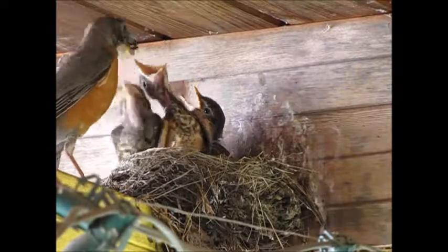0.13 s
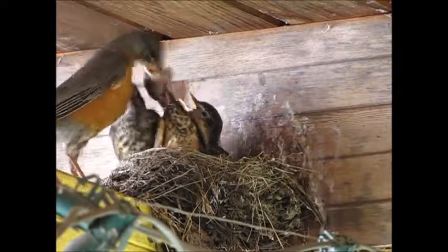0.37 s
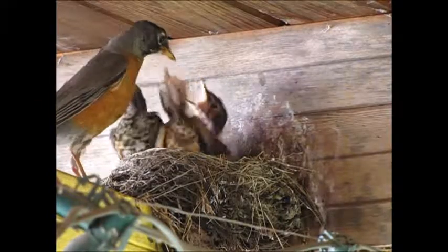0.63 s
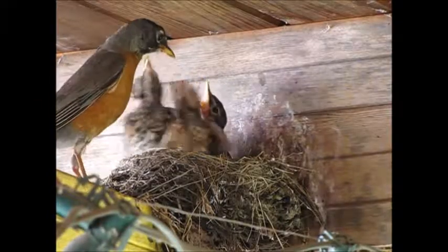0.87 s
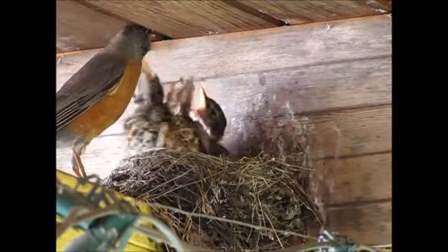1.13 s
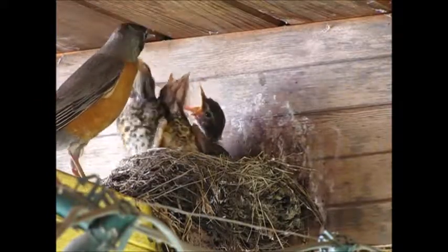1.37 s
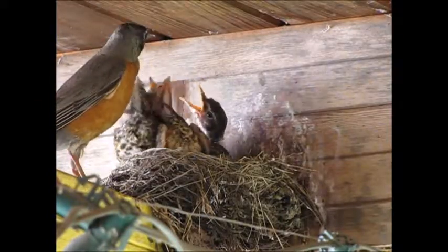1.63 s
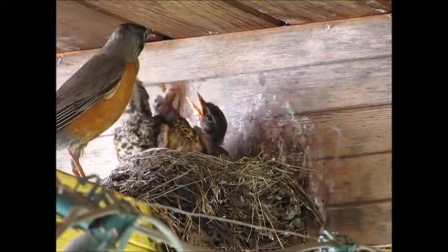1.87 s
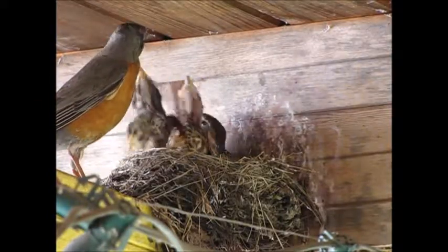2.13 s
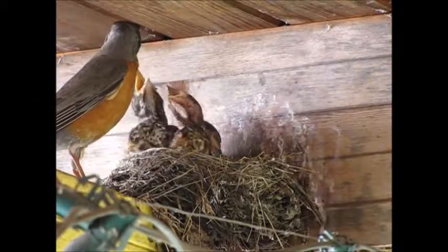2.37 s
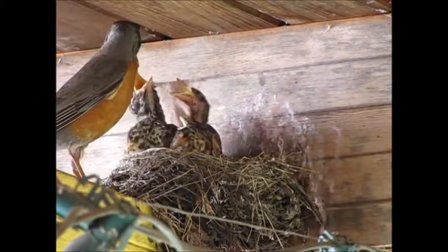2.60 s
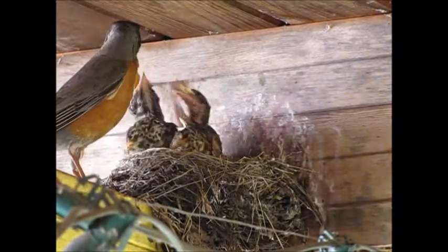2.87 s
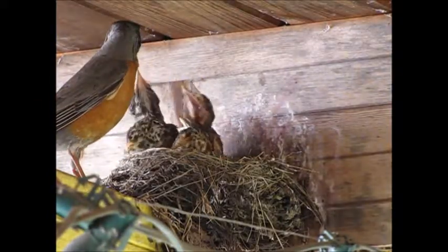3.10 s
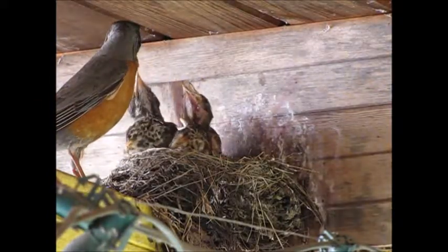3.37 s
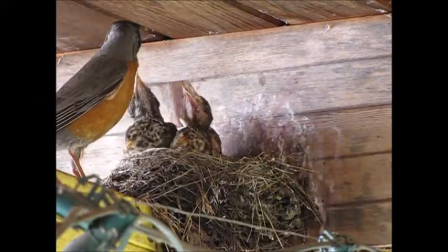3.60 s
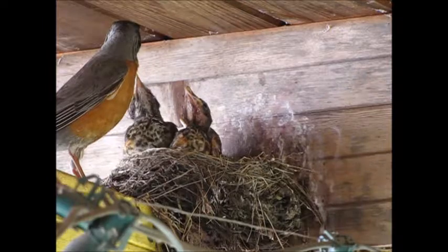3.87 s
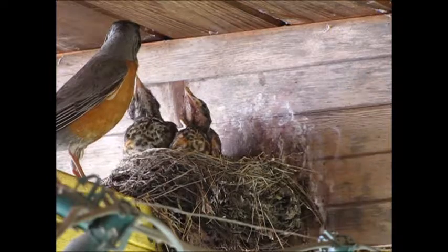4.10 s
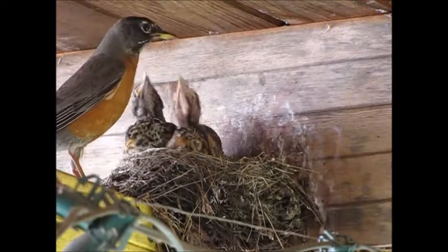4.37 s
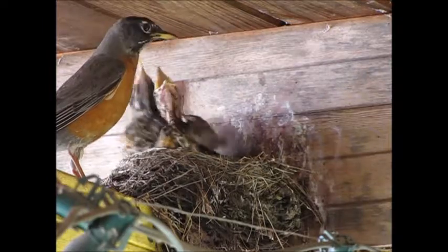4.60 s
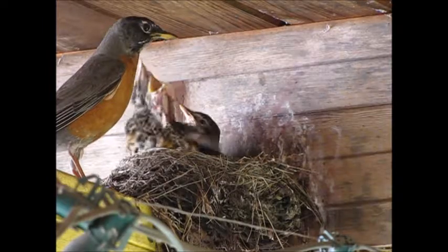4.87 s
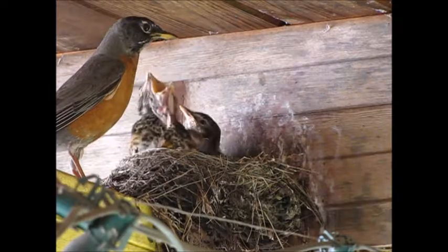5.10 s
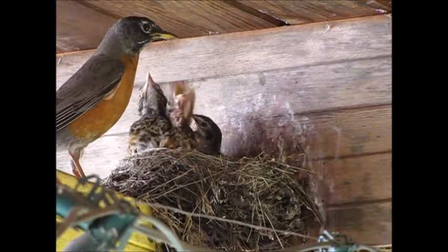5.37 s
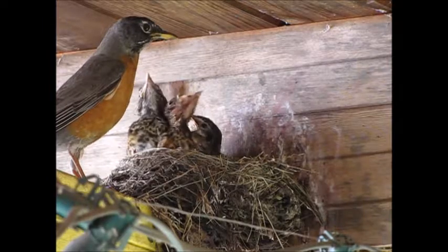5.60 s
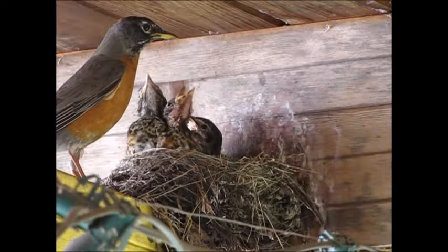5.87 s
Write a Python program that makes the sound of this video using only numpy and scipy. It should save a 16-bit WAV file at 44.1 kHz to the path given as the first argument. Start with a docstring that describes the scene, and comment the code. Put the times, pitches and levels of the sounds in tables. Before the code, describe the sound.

Young robins in a nest beneath a wooden roof give quick runs of short, piercing, arched chirps, split by brief gaps. They start fairly weak, turn brighter after two seconds, dip near four, then peak. Faint clicks, small peeps and far twitter surround them. A close stereo microphone catches short plank echoes, low hum and smooth outdoor noise.

```python
"""Nestlings beg in runs of short high chirps: arched tones from two voices of the syrinx at once.
Low feet and short broadband clicks go with the chirps, most clicks at chirp onsets.
A plank shed answers with single echoes and a dense tail; the yard beyond answers more slowly and faintly.
Peeps, level whistles, rising pips and overtones and a far twitter are short tones with their own bends.
Behind lie smooth outdoor noise and wavering low machine tones."""
import sys
import numpy as np
from scipy import signal
from scipy.io import wavfile
from scipy.ndimage import uniform_filter1d

SR = 44100
rng = np.random.default_rng(int(sys.argv[2]) if len(sys.argv) > 2 else 0)


def wrap_up_sound(samples):
    """Save the sound to the file named by the first command line argument, as 16-bit audio."""
    columns = np.atleast_2d(samples).T
    # keep every value between -1 and 1, then stretch to whole-number steps
    tamed = np.clip(columns, -1, 1)
    steps = np.round(tamed * 32767).astype(np.int16)
    wavfile.write(sys.argv[1], SR, steps)


def invert_db(x):
    """Field ratio 10**(x/20) for x, a level in decibels (scalar or array-like)."""
    u = np.asarray(x, float) / 20
    return 10 ** u


N = 263718

# Begging chirps: (crest time [s], upper voice level [dB], lower voice level [dB],
# crest pitch of the lower voice [Hz], nominal length [s])
BEGGING_CHIRPS = [(.019, -30, -36, 6430, 0.068), (0.145, -40, -34, 7330, 0.042),
                  (0.214, -41, -31, 7030, 0.06), (0.285, -40, -29, 6820, 0.06),
                  (.774, -38, -57, 6950, 0.019), (0.848, -41.5, -42, 6430, 0.068),
                  (0.931, -39.5, -48, 6360, 0.04), (1.071, -37, -32.5, 7210, 0.057),
                  (1.137, -29, -33.5, 6920, .053), (1.208, -37, -21.5, 6870, 0.05),
                  (1.352, -42.5, -38, 7240, .12), (1.417, -45, -30, 7190, 0.068),
                  (1.49, -29.5, -34.5, 6565, .073), (1.623, -38, -30.5, 7240, 0.048),
                  (1.693, -35, -39.5, 6860, 0.072), (1.771, -34, -35.5, 6750, 0.089),
                  (1.847, -34, -29.5, 6550, 0.045), (1.979, -35.5, -42, 7030, .04),
                  (1.999, -48, -31.5, 6460, 0.043), (2.151, -35, -28.5, 6850, 0.057),
                  (2.222, -30, -25.5, 6700, 0.053), (2.298, -25, -22.5, 6600, 0.05),
                  (2.375, -26, -19.5, 6405, 0.038), (2.555, -29.5, -32.5, 6930, 0.032),
                  (2.621, -34, -28, 6800, 0.064), (2.696, -29, -24.5, 6600, 0.077),
                  (2.775, -29.5, -21, 6460, 0.059), (2.97, -36, -30.5, 6920, 0.05),
                  (3.045, -39, -23, 6940, 0.063), (3.123, -34, -17, 6850, 0.046),
                  (3.203, -23, -22, 6520, 0.043), (3.391, -27.5, -32, 6830, 0.036),
                  (3.462, -34, -23, 6890, 0.055), (3.541, -28.5, -21.5, 6630, 0.055),
                  (3.621, -28, -25.5, 6450, 0.052), (3.843, -35, -42, 6920, 0.043),
                  (3.915, -33.5, -32, 6520, 0.033), (3.995, -36, -33, 6590, .049),
                  (4.079, -33.5, -32.5, 6500, 0.042), (4.314, -40, -28.5, 7150, .034),
                  (4.388, -28, -24.5, 6900, 0.063), (4.461, -22, -19, 6810, 0.064),
                  (4.54, -20, -19.5, 6670, 0.055), (4.616, -19, -18.5, 6480, 0.042),
                  (4.768, -26.5, -20, 6890, 0.041), (4.846, -27, -17.5, 6890, 0.036),
                  (4.925, -21.5, -20.5, 6660, .051), (5.009, -21.5, -19, 6690, 0.054),
                  (5.091, -23, -24, 6090, 0.036), (5.251, -32.5, -26, 7000, 0.041),
                  (5.322, -40, -20, 6970, 0.041), (5.402, -33, -19, 6820, 0.046),
                  (5.483, -20.5, -22, 6630, 0.041), (5.569, -32.5, -26.5, 6340, 0.063),
                  (5.762, -37, -28.5, 7010, .049), (5.835, -44, -26.5, 6900, 0.055),
                  (5.919, -33, -29.5, 6730, 0.066)]
# Aim of the singing head: (time [s], turn [0 facing to 1 away])
HEAD_TURN = [(0, 0.49), (.9, 0.78), (1.2, 0.42), (1.4, 0.43), (2.05, 0.6), (2.15, 0.079), (3.7, 0.069),
             (3.9, 0.63), (4.2, 0.37), (4.4, 0.11), (6, 0.22)]
PAUSE_S = 0.1  # a longer gap between crests parts two runs
LEG_HZ = 3990  # sweep of the lower voice from crest to foot
VOICE_GAP_HZ = 431  # the upper voice crests this far above the lower
FALL_LEG_DB = -5  # thin part of the falling leg relative to the rising one
FALL_FADE = 1.07  # fade per kHz after the crest over swell per kHz before it
BROKEN_DB = 4  # rms flicker of thin legs and faint notes

# Low feet where chirps begin or end their sweep:
# (start [s], length [s], nominal level [dB], lowest pitch [Hz])
CHIRP_FEET = [(1.175, .027, -44, 2375), (1.229, .014, -44, 2200), (1.501, .019, -43, 2335),
              (3.182, 0.013, -46, 3030), (3.225, 0.022, -44, 2400), (3.583, 0.03, -48.5, 2630),
              (3.649, 0.022, -45.5, 2270), (3.957, 0.03, -45, 2480), (4.058, 0.015, -44, 3050),
              (4.101, 0.0264, -46, 2320), (5.452, 0.018, -47, 2480), (5.538, 0.019, -44, 2490),
              (5.881, 0.029, -46.5, 2436), (5.947, 0.018, -49.5, 2720)]
FOOT_BEND_HZ, FOOT_CURVE = 1283, 3  # the bend steepens towards the chirp
# Short broadband clicks, most at chirp onsets: (start [s], level before colouring [dB])
CHIRP_CLICKS = [(.4744, -62), (.5644, -65), (.759, -52), (.836, -51), (.918, -47.5), (4.2985, -51),
                (4.749, -57), (5.233, -61)]
# Colour of a click: (frequency [Hz], gain [dB])
CLICK_COLOUR = [(1500, -25), (4000, 7), (8000, 11.5), (12000, 9), (16000, 4)]
CLICK_S = 0.011  # time constant of the decay

# Soft cup-shaped peeps: (start [s], length [s], nominal level [dB], middle pitch [Hz])
CUPPED_PEEPS = [(0.632, .057, -48.5, 1735), (.855, 0.059, -51, 1775), (0.925, 0.054, -46.5, 1810),
                (1.338, 0.028, -50.5, 1750), (1.411, 0.026, -44.5, 3140), (1.475, 0.031, -52, 1790),
                (1.567, .038, -47, 3250), (1.64, 0.055, -57, 3080), (1.721, .051, -52, 3140),
                (4.529, .034, -51.5, 1760)]
PEEP_BEND_HZ = 674  # rise at either end
# Level whistles, some at chirp pitch near 7 kHz: (start [s], length [s], nominal level [dB], pitch [Hz])
LEVEL_WHISTLES = [(0.225, 0.028, -49.5, 1900), (0.396, .038, -54, 7100), (0.689, 0.13, -51, 4400),
                  (0.979, .03, -46, 7370), (1.298, 0.023, -47, 7640), (1.467, .014, -41, 4380),
                  (1.519, 0.037, -37.5, 7260), (1.756, .015, -46, 4470), (1.808, .025, -50, 7100),
                  (1.933, .015, -41, 7440), (2.322, 0.031, -51, 2960), (2.911, 0.029, -46, 6630),
                  (3.649, 0.036, -49, 4440), (3.71, 0.04, -57, 4440), (3.781, 0.082, -60, 4450),
                  (5.96, .021, -51.7, 3300)]
# Rising pips, and the rising overtones of two chirps, an octave above them (the two highest):
# (start [s], nominal level [dB], middle pitch [Hz])
RISING_NOTES = [(.464, -47, 4150), (.549, -47.5, 3850), (.562, -48, 6650), (.843, -54, 14200),
                (.92, -51, 13400), (1.825, -45, 3850)]
RISING_S, RISING_SLIDE, RISING_FLICK_HZ = 0.0297, 0.19, 300  # length, slide as share of pitch, final flick up
# Far twittering flock: (time [s], mean nominal level of a note [dB])
FLOCK_LEVEL = [(0, -57), (.6, -58), (1.5, -57), (2.2, -64), (6, -65)]
FLOCK_NOTES_PER_S = 70

# Echoes from the nearest planks: (delay [s], left level [dB], right level [dB])
PLANK_ECHOES = [(.0071, -17, -16), (.0125, -11, -12), (.0157, -19, -21), (.045, -22, -23)]
# Decay of the shed: (frequency [Hz], time to fall 60 dB [s])
SHED_DECAY = [(2000, 0.5), (5000, 0.2), (7000, 0.17), (10000, 0.22)]
TAIL_DB, TAIL_FILL_S = -5.5, 0.026  # energy of the whole tail, time it takes to build
YARD_DB, YARD_T60_S = -14, 0.47  # return from beyond the shed, relative to the shed's
LEFT_LAG_S = 0.00003  # direct sound reaches the left port this much later

# Spectrum of the outdoor air: (frequency [Hz], relative density [dB per Hz])
AIR_SPECTRUM = [(15, -43), (25, 3), (101, -1.5), (169, -11.5), (246, -14.5), (582, -15.5), (826, -14.5),
                (2300, -22), (3630, -22), (5000, -27.5), (7000, -30), (8000, -34), (9300, -43),
                (15500, -45)]
# Left-right likeness of the air: (frequency [Hz], correlation)
AIR_LIKENESS = [(60, 0.92), (180, 0.83), (550, 0.85), (1650, 0.24), (4970, 0.48), (15000, 0.05)]
# Balance of the air: (frequency [Hz], left over right [dB])
AIR_BALANCE = [(60, 1.5), (240, 2.5), (950, 1.0), (3770, -1), (15000, 3.5)]
AIR_DB = -41  # rms over both ports
# Tones of the machine: (mean pitch [Hz], level at the centre [dB rms], rms pitch wander [Hz])
MACHINE_TONES = [(59.24, -47, 6.01), (120.1, -46, 2.85), (140, -58, 4.2), (167.8, -55, 2.91),
                 (321.5, -60.5, 8.14)]


def read(points, hz):
    """Log-frequency interpolation: reads a spectrum between its points."""
    f, value = np.transpose(points)
    return np.interp(np.log(hz + 1), np.log(f + 1), value)


def add(mix, s, sound):
    """Superposition: adds a sound at a moment, cutting what falls outside the mix."""
    at = round(s * SR)
    sound = sound[..., max(-at, 0):]
    part = mix[..., max(at, 0):][..., :sound.shape[-1]]
    part += sound[..., :part.shape[-1]]


def drift(length, seconds):
    """Low-pass noise: twice-averaged chance of rms 1."""
    size = max(round(seconds * SR), 2)
    x = uniform_filter1d(uniform_filter1d(rng.standard_normal(length), size), size)
    return x / np.sqrt(np.mean(x ** 2))


def tone(hz):
    """Phase is the integral of frequency: a sine of rms 1 on a pitch curve."""
    phase = 2 * np.pi * (np.cumsum(hz) / SR + rng.random())
    return np.sqrt(2) * np.sin(phase)


def chirp(upper_db, lower_db, lower_hz, length, place, turn):
    """Beak directivity: two arched voices, beamed forward at the crest, with thin legs fuller in the shed."""
    opens = place == 0
    rise, fall = 0.42 * length, (0.5 if opens else 0.58) * length
    t = np.arange(-rise, fall, 1 / SR)
    along = np.where(t < 0, -t / rise, t / fall)
    drop_hz = np.where((t < 0) & opens, 400, LEG_HZ) * along ** 2.8  # a run opens near the crest
    edge = np.clip(np.minimum(t - t[0], t[-1] - t) / (0.002 if opens else 0.005), 0, 1)
    out = np.zeros((2, len(t)))  # rows: in front, all round
    voices = ((upper_db, lower_hz + VOICE_GAP_HZ, 0.8, -66), (lower_db, lower_hz, 1, -56))
    for db, crest_hz, reach, leg_db in voices:
        hz = crest_hz - reach * drop_hz + 45 * drift(len(t), 0.002)
        under_khz = reach * drop_hz / 1000
        fade = under_khz * np.where(t > 0, FALL_FADE, 1)
        beam = invert_db(db - np.outer([17, 9], fade))  # dB lost per kHz below the crest
        thin_db = min(leg_db + 3 * min(place, 3) + 5 * turn, db)  # the legs grow early in a run
        thin_db = thin_db + FALL_LEG_DB * (t > 0) - 0.28 * under_khz
        thin = invert_db(thin_db + BROKEN_DB * drift(len(t), 0.0065))
        level = np.hypot(beam, thin)
        level *= invert_db(1.5 * drift(len(t), 0.003))
        breath = invert_db(-34) * np.diff(rng.standard_normal(len(t) + 1))  # thin hiss of the air stream
        rasp = 1 + invert_db(-21 + 13 * turn) * drift(len(t), 0.00035)  # fast flutter, stronger when turned away
        out += level * (rasp * tone(hz) + breath)
    swing = out / abs(out).max()
    out *= 1 + invert_db(-51) * swing - 0.14 * swing ** 2  # the voices mix in one pipe: sum tones and side lines
    out[1] *= invert_db(5.8 * turn)  # a turned head sings more to the planks
    return rise, edge * out


def nestlings():
    """Source directivity in time: each chirp follows its place in the run and the turn of the head."""
    out, place = np.zeros((2, N)), 2  # the first chirp falls within a run
    pauses = np.diff([0] + [row[0] for row in BEGGING_CHIRPS]) > PAUSE_S
    for (s, *voice), opens in zip(BEGGING_CHIRPS, pauses):
        place = 0 if opens else place + 1
        turn = np.clip(np.interp(s, *np.transpose(HEAD_TURN)), 0, 1)
        lead, sound = chirp(*voice, place, turn)
        add(out, s - lead, sound)
    return out


def chirp_clicks():
    """Broadband transients: coloured noise that swells at once and dies away."""
    out = np.zeros(N)
    for s, db in CHIRP_CLICKS:
        t = np.arange(round(4 * CLICK_S * SR)) / SR / CLICK_S  # in time constants
        crackle = rng.standard_normal(len(t)) * invert_db(3 * drift(len(t), 0.0006))
        add(out, s, invert_db(db) * crackle * np.minimum(t / 0.29, 1) * np.exp(-t ** 2))
    hz = np.linspace(0, SR / 2, 65)
    colour = signal.firwin2(129, hz, invert_db(read(CLICK_COLOUR, hz)), fs=SR)
    return signal.oaconvolve(out, colour, "same")


def note(length, db, hz, bend_hz):
    """Frequency modulation: a flickering whistle, bent by bend_hz(place from -1 start to 1 end)."""
    along = np.linspace(-1, 1, round(length * SR))
    fade = signal.windows.tukey(len(along), 0.2)
    level = invert_db(db - 1.5 + BROKEN_DB * drift(len(along), 0.003))  # -1.5 offsets power gained by flicker
    pitch = hz + bend_hz(along) + 50 * drift(len(along), 0.002)
    return level * tone(pitch) * fade


def ends(start_hz, end_hz):
    """Quartic pitch law: nearly level in the middle and bent at the ends."""
    return lambda along: np.where(along < 0, start_hz, end_hz) * abs(along) ** 4


def chirp_feet(out):
    """One-sided glide: low feet bend up into the nearest chirp or down out of it."""
    crests = np.array(BEGGING_CHIRPS)[:, 0]
    for s, length, db, hz in CHIRP_FEET:
        nearest = crests[np.argmin(abs(crests - s - length / 2))]
        way = np.sign(nearest - s)
        add(out, s, note(length, db, hz, lambda along: FOOT_BEND_HZ * ((1 + way * along) / 2) ** FOOT_CURVE))


def far_flock(out):
    """Random superposition: short notes at chance moments, pitches and bends make a twitter."""
    for when, length, size, pitch, start, end in rng.random((round(FLOCK_NOTES_PER_S * N / SR), 6)):
        s = when * N / SR
        db = np.interp(s, *np.transpose(FLOCK_LEVEL)) + 8 * (size - 0.5)
        bend = ends(2400 * (start - 0.5), 2400 * (end - 0.5))
        add(out, s, note(0.006 + 0.01 * length, db, 2400 + 2400 * pitch, bend))


def faint_notes():
    """Superposed glides: chirp feet, peeps, level whistles and rising notes, over the far flock."""
    out = np.zeros(N)
    chirp_feet(out)
    for s, *shape in CUPPED_PEEPS:
        add(out, s, note(*shape, ends(PEEP_BEND_HZ, PEEP_BEND_HZ)))
    for s, *shape in LEVEL_WHISTLES:
        add(out, s, note(*shape, np.zeros_like))
    for s, db, hz in RISING_NOTES:
        add(out, s, note(RISING_S, db, hz, ends(-RISING_SLIDE * hz, RISING_FLICK_HZ)))
    far_flock(out)
    return out


def room_response():
    """Diffuse reverberation: random reflections decay band by band, with single plank echoes."""
    taps = np.zeros((2, SR // 2))
    slots = np.arange(200, SR // 2 - 20, 20)
    at = slots + rng.integers(0, 20, (2, len(slots)))
    np.put_along_axis(taps, at, rng.choice([-1., 1.], at.shape), 1)
    hz, t, z = signal.stft(taps, SR, nperseg=256)
    shed_decay = invert_db(-60 * t / read(SHED_DECAY, hz)[:, None])
    yard_decay = invert_db(YARD_DB - 60 * t / YARD_T60_S)
    z *= np.hypot(shed_decay, yard_decay) * np.minimum(t / TAIL_FILL_S, 1)
    tail = signal.istft(z, SR, nperseg=256)[1]
    room = invert_db(TAIL_DB) * tail / np.linalg.norm(tail[0])
    for delay, left_db, right_db in PLANK_ECHOES:
        room[:, round(delay * SR)] += invert_db(np.array([left_db, right_db]))
    return room


def shed(front, around):
    """Image of a source in a room: direct sound in front plus the room's answer to sound all round."""
    lag = np.array([[LEFT_LAG_S * SR], [0]])
    ports = np.sinc(np.arange(-32, 33) - lag) * invert_db(np.array([[-0.3], [0.3]]))
    direct = signal.oaconvolve(front[None], ports, axes=1)[:, 32:N + 32]
    return direct + signal.fftconvolve(around[None], room_response(), axes=1)[:, :N]


def air():
    """Spatial coherence: noise of far traffic and leaves, most alike in both ports in the bass."""
    frames, hz = N // 512 + 5, np.fft.rfftfreq(2048, 1 / SR)
    a, b, c, d, patches = rng.standard_normal((frames, 1025, 5)).T
    patches = uniform_filter1d(uniform_filter1d(patches, 20, 0), 8, 1)
    same = np.clip(read(AIR_LIKENESS, hz), -1, 1)[:, None]
    left = a + 1j * b
    right = same * left + np.sqrt(1 - same ** 2) * (c + 1j * d)
    lean = read(AIR_BALANCE, hz)[:, None] / 2
    level = read(AIR_SPECTRUM, hz)[:, None] + 1.12 * patches / patches.std()
    z = np.array([left, right]) * invert_db(level + np.array([lean, -lean]))
    x = signal.istft(z, nperseg=2048, noverlap=1536)[1][:, :N]
    return invert_db(AIR_DB) * x / np.sqrt(np.mean(x ** 2))


def hum():
    """Narrow-band modulation: wavering low tones of a nearby machine, a little louder on the left."""
    out = np.zeros(N)
    for hz, db, wander in MACHINE_TONES:
        level = invert_db(db + 2 * drift(N, 0.038))
        out += level * tone(hz + wander * drift(N, 0.0317))
    return out * invert_db(np.array([[1.1], [-1.1]]))


def scene():
    """Superposition of fields: chirps, clicks and faint notes in the shed, over air and hum."""
    faint = faint_notes() * invert_db(np.array([[0], [-5]]))  # set with less room sound
    front, around = nestlings() + chirp_clicks() + faint
    return shed(front, around) + air() + hum()


def low_pass(x):
    """Removes everything above the highest recorded frequency."""
    return signal.sosfilt(signal.butter(12, 16340, fs=SR, output="sos"), x)


def record(dry):
    """Low-pass response: the microphone dulls the top treble."""
    dulled = signal.sosfilt(signal.butter(4, 14500, fs=SR, output="sos"), dry)
    return low_pass(dulled)


dry = scene()
out = record(dry)
wrap_up_sound(out)
```